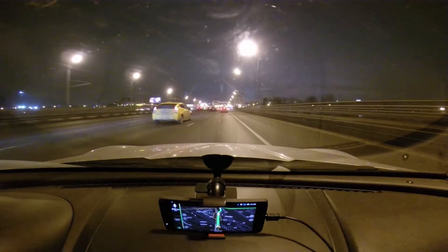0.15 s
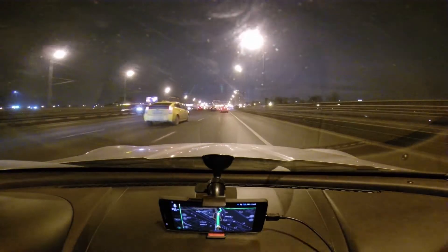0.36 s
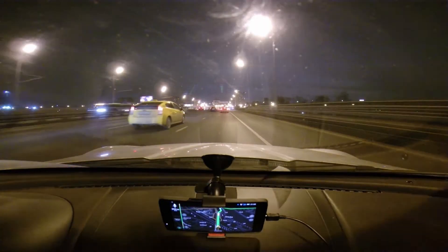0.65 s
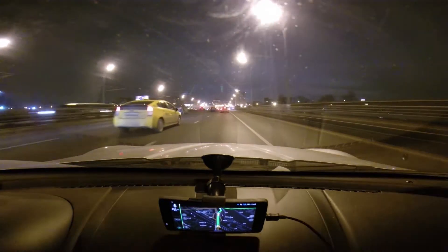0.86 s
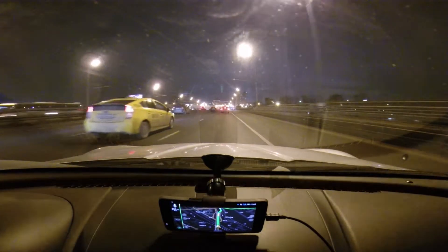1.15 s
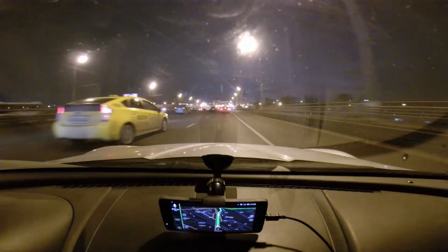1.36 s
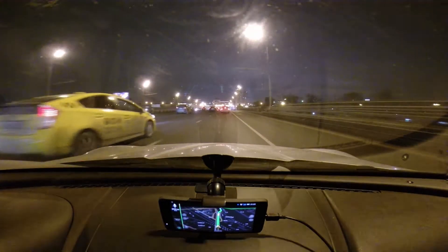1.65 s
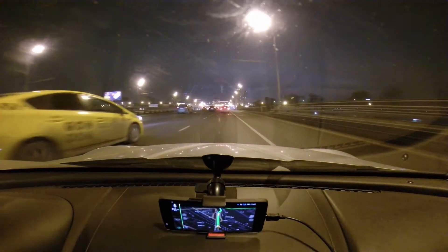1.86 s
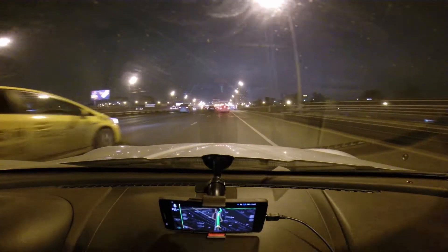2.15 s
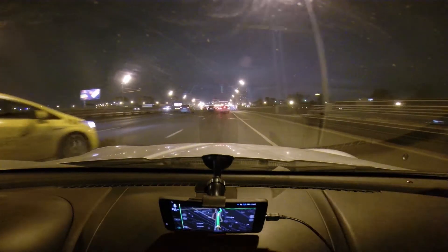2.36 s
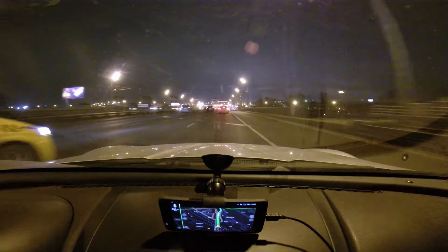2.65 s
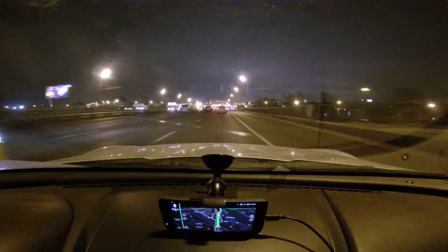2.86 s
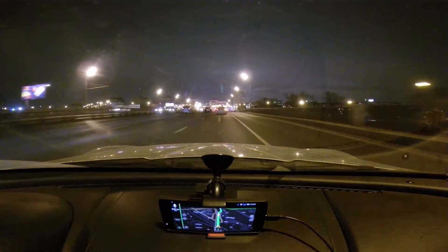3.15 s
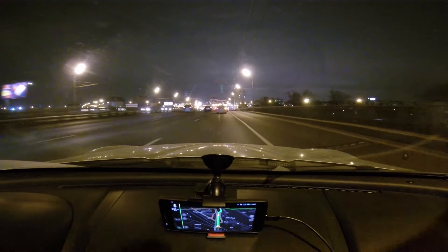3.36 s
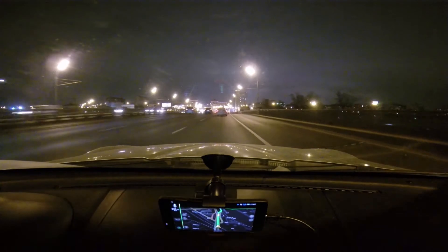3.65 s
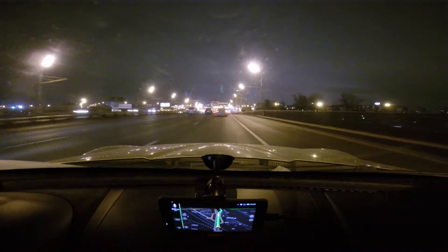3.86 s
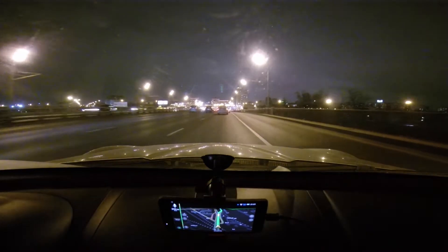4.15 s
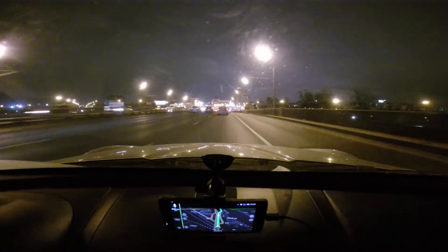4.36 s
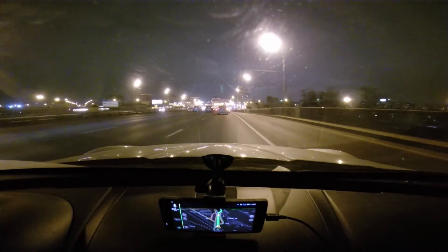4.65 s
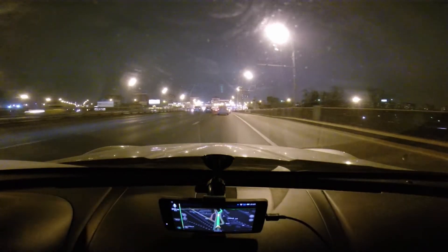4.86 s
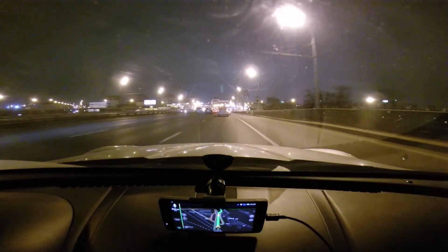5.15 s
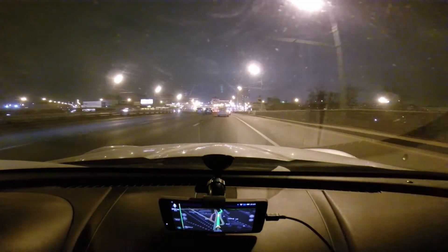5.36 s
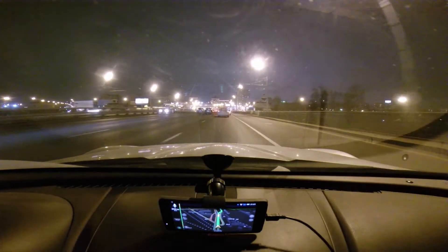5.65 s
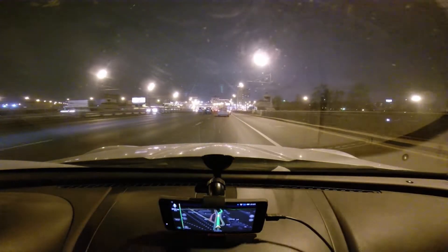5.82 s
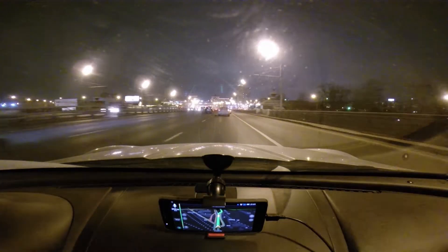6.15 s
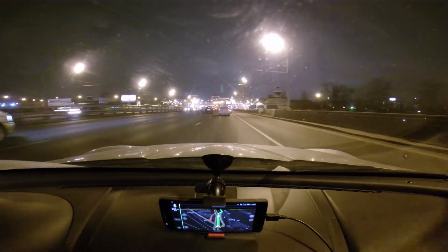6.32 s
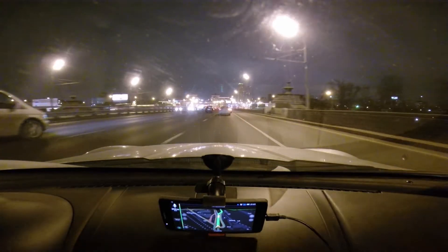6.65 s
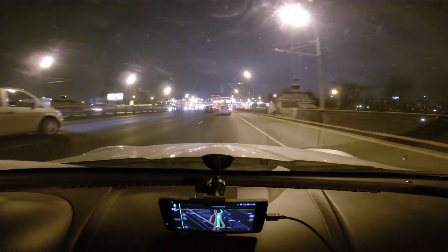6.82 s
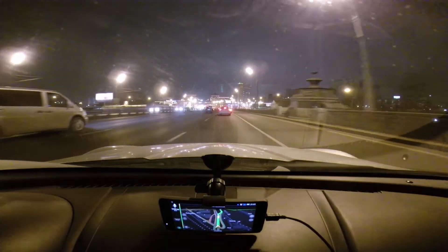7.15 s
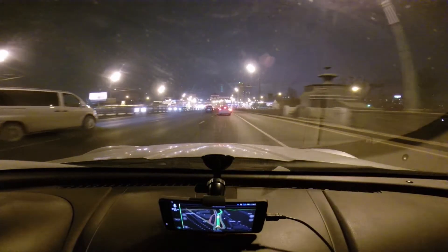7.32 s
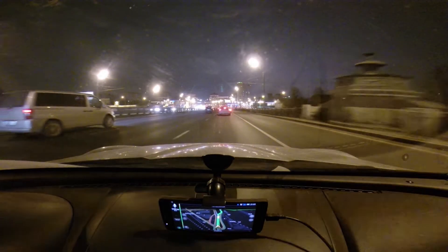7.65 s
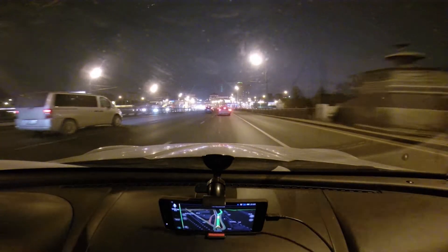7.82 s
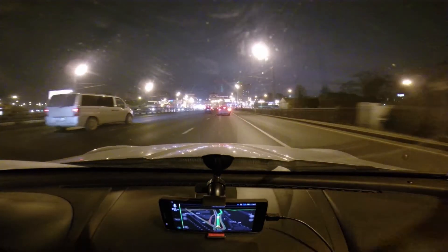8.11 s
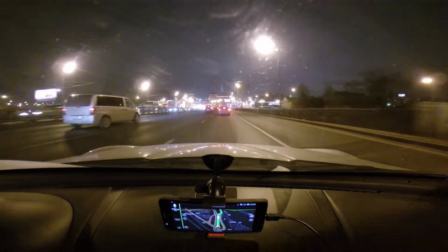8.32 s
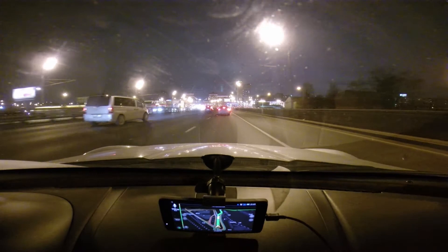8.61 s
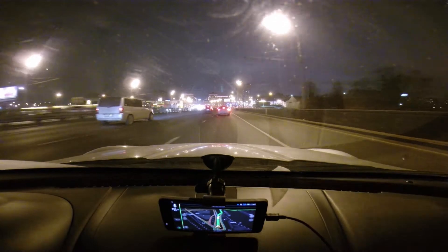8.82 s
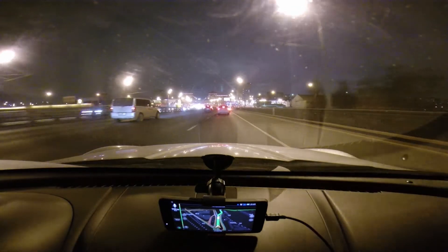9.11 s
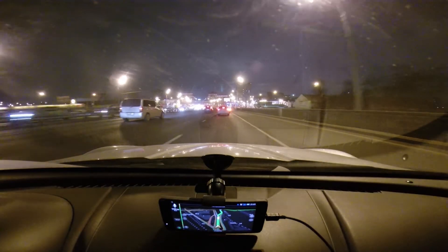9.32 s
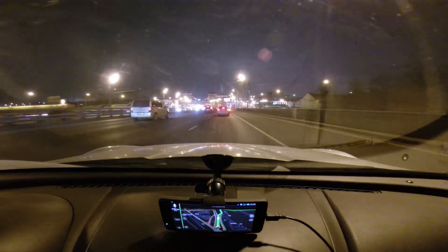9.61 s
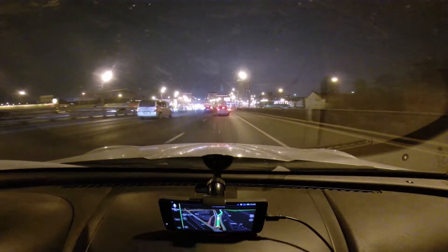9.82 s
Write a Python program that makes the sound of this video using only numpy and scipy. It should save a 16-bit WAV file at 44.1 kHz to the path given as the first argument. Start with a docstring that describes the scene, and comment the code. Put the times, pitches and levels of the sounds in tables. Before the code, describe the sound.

Steady highway cabin drone: low throbbing road boom, tyre roar, whistling air at the seals, faint engine hum and one brief trim rattle.

```python
"""A deep, fluttering boom, made from noise ringing the cabin air, swells with bumps in a car on a motorway.
Noise through resonances also gives the body rumble, panel hum and tyre roar, which share one level curve.
Filtered noise whistles and hisses at the seals and gaps, over a faint engine hum made of sine tones.
Very faint high buzz comes in short bursts, the tread sings for a while, and loose trim rattles
in one patch of short knocks."""
import sys
import numpy as np
from scipy import signal
from scipy.fft import rfft, irfft, next_fast_len
from scipy.io import wavfile
from scipy.ndimage import uniform_filter1d, minimum_filter1d

SR = 44100
rng = np.random.default_rng(int(sys.argv[2]) if len(sys.argv) > 2 else 0)


def dump_mix(stems):
    """Bounce the given channels to the path in sys.argv[1] as a 16-bit WAV at rate SR."""
    frames = np.atleast_2d(stems).T  # one column per channel
    limited = np.clip(frames, -1, 1)  # hard clip at full scale
    pcm = np.round(limited * 32767).astype(np.int16)
    wavfile.write(sys.argv[1], SR, pcm)


N = 440098

# In every MODES table the levels only compare the resonances of that table with each other.
# shared level of the road and wind noise; its sudden dips, written in here, stand for
# the recorder's gain control ducking after strong peaks: t/s, level change/dB
ROAD_WIND_LEVEL = [(0, 3), (0.5, 0.3), (1.1, 3), (1.8, 2.5), (2.1, 1), (3.32, 2), (3.6, -3.5), (4.0, 0.4),
                   (4.25, -1.5), (4.7, 0.5), (5.78, 0.2), (5.84, -4.5), (6.35, 0.23), (8.6, 0.5),
                   (8.78, -1.5), (9.25, 0.5), (9.84, -0.3), (9.98, -5)]
# bumps that set the boom, before the boom trim: start/s, length/s, level/dB
BUMPS = [(0.031, 0.088, -9.5), (0.289, 0.23, -8.5), (0.984, 0.034, -10), (1.075, 0.04, -8.5),
         (1.219, 0.04, -8.5), (1.275, 0.104, -9.5), (1.554, 0.042, -8), (1.699, 0.049, -11.5),
         (1.914, 0.086, -7), (2.063, 0.075, -7.5), (2.449, 0.068, -11), (2.795, 0.088, -9),
         (2.915, 0.099, -8.5), (3.199, 0.088, -9), (3.343, 0.076, -6), (3.479, 0.068, -8),
         (4.139, 0.088, -8), (4.856, 0.034, -10), (5.012, 0.064, -8.5), (5.286, 0.065, -7),
         (5.436, 0.038, -7.5), (5.607, 0.04, -8), (5.674, 0.031, -8), (5.782, 0.048, -7.5),
         (6.649, 0.06, -10), (6.791, 0.1, -10), (7.117, 0.23, -9), (7.702, 0.032, -7.5),
         (7.788, 0.064, -9.5), (8.057, 0.046, -8), (8.727, 0.079, -5.5), (9.318, 0.03, -10),
         (9.739, 0.026, -6.5), (9.847, 0.062, -5.5)]
# short lulls where the boom sinks, some standing for the same gain ducking: start/s, length/s, change/dB
LULLS = [(0.14, .08, -8), (.85, 0.088, -6.5), (2.17, 0.14, -14), (2.66, 0.13, -5.5), (3.6, 0.074, -4.5),
         (5.86, 0.27, -4), (8.26, .07, -10.5)]
# jolts through the suspension: start/s, length/s, body rumble change/dB, panel hum change/dB
JOLTS = [(1.6, 0.27, 3, 1.5), (2.583, 0.089, -4, 7.5), (3.17, 0.37, 7.5, 2.5), (4.5, .15, 6, 0.5),
         (9.246, 0.27, 3.5, 2)]
# resonances of the cabin air that make the boom: f/Hz, width/Hz, level/dB
CABIN_MODES = [(107.36, 9.9, 2), (110.4, 12, -5)]
# weaker air resonances on either side of the boom: f/Hz, width/Hz, level/dB
FLANK_MODES = [(88, 10, -6), (123.7, 14, 0)]
# resonances of the sprung car body: f/Hz, width/Hz, level/dB
BODY_MODES = [(24, 32, -8), (41.5, 17, 2), (65.6, 34, -3)]
# resonances of the floor panels: f/Hz, width/Hz, level/dB
PANEL_MODES = [(143.8, 11, 0.5), (163.2, 26, -1.5), (200.6, 7.9, -10.5), (223.4, 50, -15)]
# resonances of the tyres, carcass and tread: f/Hz, width/Hz, level/dB
TYRE_MODES = [(302, 58, -1.5), (376.8, 74, -6), (473, 58, -11), (565.5, 76, -6.5), (640, 110, -10),
              (721, 125, -8.5), (832, 55, -8.5), (936, 50, -3.5), (1037, 140, -5.5), (1199, 190, -6),
              (1369, 110, -8.5), (1537, 180, -11), (1676, 215, -12), (1835, 74, -14.5), (2014, 310, -14)]
# resonances at the window seals: f/Hz, width/Hz, level/dB
SEAL_MODES = [(2010, 130, -9), (2488, 160, 0.0), (2680, 72, -3.2), (2780, 320, -7.3)]
# resonances of the gaps in the trim: f/Hz, width/Hz, level/dB
GAP_MODES = [(3447, 510, 3), (4250, 1234, -1), (5130, 1900, -9.5), (5870, 353, -5), (7924, 12000, -27.5)]
# the main engine tone heard in the cabin: t/s, f/Hz, level/dB
ENGINE = [(0, 322, -41), (.7, 314, -40), (1.3, 308, -41), (2.4, 286, -44), (3.6, 300, -58), (6, 318, -56),
          (7, 313, -50), (9.98, 306, -54)]
# resonances of the high buzz: f/Hz, width/Hz, level/dB
BUZZ_MODES = [(6780, 200, -13.5), (7450, 160, -2.5), (8120, 220, -9), (8750, 240, -10.5),
              (11300, 7000, -19.5)]
# the narrow resonance of the singing tread: f/Hz, width/Hz, level/dB
SONG_MODES = [(571, 11, 0)]
# knocks of loose trim: t/s, peak level/dB, top edge f/Hz, decay/s
RATTLE = [(3.263, -31, 9500, .005), (3.280, -19.5, 4400, .0022), (3.314, -21, 9500, .003),
          (3.333, -18, 4300, .002), (3.365, -38, 9500, .002), (3.428, -33, 7000, .004),
          (3.502, -27, 3500, .002)]
# resonances of the loose trim: f/Hz, width/Hz, level/dB
TRIM_MODES = [(1400, 800, 1), (2400, 900, 0), (3450, 1000, 0), (4500, 700, -7), (7000, 6000, -20)]

# the boom between bumps, before the boom trim, and its random swelling
BOOM_DB, BOOM_FLUTTER_DB, BOOM_FLUTTER_S = -15, 2.5, 0.044
BUMP_EDGE_S, JOLT_EDGE_S = 0.028, 0.065  # smoothing of the rises and falls
FLANK_DB = -21.5
# levels where the shared level curve is at 0 dB, before jolts and other swelling
RUMBLE_DB, PANEL_DB, DRUM_DB = -28.5, -29, -40.5
TREAD_DB, WHISTLE_DB, HISS_DB = -35.5, -45.5, -57.5
BOOM_FOLLOW, BODY_FOLLOW, HISS_FOLLOW = 0.75, 0.5, 0.87  # dB per dB of the shared level curve
DRUM_JOLT_SHARE = 0.53  # part of the panels' jolt, in dB, that the tyre drumming shares
# the seal whistle grows and stays louder
WHISTLE_RISE_S, WHISTLE_RISE_LENGTH_S, WHISTLE_RISE_DB = 5.78, 0.64, 5
SONG_START_S, SONG_LENGTH_S, SONG_DB = 1.45, 1.3, -45.5
TOP_HZ = 13500  # the whole sound is cut above this


def undb(db):
    """Turn decibels into a gain."""
    return 10 ** (np.asarray(db) / 20)


def curves(table):
    """Join the columns of a table by straight lines in time."""
    s, *columns = np.transpose(table)
    return [np.interp(np.arange(N) / SR, s, column) for column in columns]


def unit(x):
    """Scale to an rms (average strength) of 1."""
    return x / np.sqrt(np.mean(x ** 2))


def resonate(x, modes):
    """Pass a force through steep resonances whose powers add, then scale to rms 1."""
    size = next_fast_len(len(x))
    f = np.maximum(np.arange(size // 2 + 1) * SR / size, 1)
    power = np.zeros(len(f))
    for hz, width, db in modes:
        offset = (f * f - hz * hz) / (f * width)  # distance from the peak
        power += undb(db) ** 2 / (1 + offset ** 2) ** 2
    rung = irfft(rfft(x, size) * np.sqrt(power), size)
    return unit(rung[:len(x)])


def noise():
    """Make the random push of road grain or turbulent air."""
    return rng.standard_normal(N)


def smooth(x, seconds):
    """Take a running mean twice."""
    size = max(int(seconds * SR), 1)
    return uniform_filter1d(uniform_filter1d(x, size), size)


def steady(x, seconds):
    """Even out swells slower than the given time; quicker beating stays."""
    power = np.maximum(smooth(x * x, seconds), 0)
    return unit(x / np.sqrt(power + 1e-6))


def band(x, low_hz, high_hz):
    """Keep one band of pitches, with steep edges and no delay."""
    sos = signal.butter(4, [low_hz, high_hz], "band", fs=SR, output="sos")
    return signal.sosfiltfilt(sos, x)


def stretches(rows, edge_s):
    """Set each (start, length, size) stretch and round its edges; very short ones stay below full size."""
    out = np.zeros(N)
    for start, length, size in rows:
        out[max(int(start * SR), 0):int((start + length) * SR)] = size
    return smooth(out, seconds=edge_s)


def boom_level(level_db):
    """The boom flutters between bumps and sinks in lulls; each bump moves it to a level of its own, in dB."""
    flutter = BOOM_FLUTTER_DB * unit(smooth(noise(), seconds=BOOM_FLUTTER_S))
    between = BOOM_DB + BOOM_FOLLOW * level_db + flutter
    between += stretches(LULLS, BUMP_EDGE_S)
    on_bump = stretches([(start, length, 1) for start, length, _ in BUMPS], BUMP_EDGE_S)
    return (1 - on_bump) * between + stretches(BUMPS, BUMP_EDGE_S)


def cabin_boom(level_db, trim_db, low_hz, high_hz):
    """Road noise rings the cabin's air resonances, which beat against each other."""
    gain = undb(boom_level(level_db) + trim_db)
    air = resonate(noise(), CABIN_MODES)
    # shaping twice lets the air follow the bumps while it stays in its narrow band
    for _ in range(2):
        air = band(steady(air, seconds=0.038) * gain, low_hz, high_hz)
    # the flanking resonances murmur on between bumps
    flank = steady(resonate(noise(), FLANK_MODES), seconds=0.05)
    return air + flank * undb(FLANK_DB)


def body_rumble(level_db):
    """Road noise rocks the sprung body at its low resonances, and jolts change the rumble."""
    jolts = stretches([(start, length, db) for start, length, db, _ in JOLTS], JOLT_EDGE_S)
    body = steady(resonate(noise(), BODY_MODES), seconds=0.17)
    return body * undb(RUMBLE_DB + BODY_FOLLOW * level_db + jolts)


def panel_hum(level_db, jolts):
    """Road noise shakes the floor panels, which hum at their resonances."""
    panels = steady(resonate(noise(), PANEL_MODES), seconds=0.36)
    return panels * undb(PANEL_DB + BODY_FOLLOW * level_db + jolts)


def tyre_roar(level_db, jolts, split_hz):
    """Road grain drums the tyre carcasses below the split and makes the tread roar above it."""
    carcass_modes = [mode for mode in TYRE_MODES if mode[0] < split_hz]
    tread_modes = [mode for mode in TYRE_MODES if mode[0] >= split_hz]
    drum_db = DRUM_DB + BODY_FOLLOW * level_db + DRUM_JOLT_SHARE * jolts
    drum = resonate(noise(), carcass_modes) * undb(drum_db)
    tread = resonate(noise(), tread_modes) * undb(TREAD_DB + level_db)
    return drum + tread


def wind(level_db, flutter_db):
    """Turbulent air whistles at the seals and hisses in the gaps, fluttering with its eddies."""
    rise = np.clip((np.arange(N) / SR - WHISTLE_RISE_S) / WHISTLE_RISE_LENGTH_S, 0, 1)
    eddies = undb(flutter_db * unit(smooth(noise(), seconds=0.027)))
    whistle = resonate(noise(), SEAL_MODES) * undb(WHISTLE_DB + level_db + WHISTLE_RISE_DB * rise)
    hiss = resonate(noise(), GAP_MODES) * undb(HISS_DB + HISS_FOLLOW * level_db)
    return (whistle + hiss) * eddies


def engine(below_db, above_db, waver_db):
    """The engine hums on one tone plus the octaves below and above it, slightly uneven in level."""
    hz, db = curves(ENGINE)
    phase = 2 * np.pi * np.cumsum(hz) / SR
    hum = np.sin(phase)
    hum += undb(below_db) * np.sin(phase / 2)
    hum += undb(above_db) * np.sin(2 * phase)
    waver = waver_db * unit(smooth(noise(), seconds=0.19))
    return unit(hum) * undb(db + waver)


def buzz(db, gap_s, length_s, scatter):
    """High, resonant noise sounds in short bursts at uneven intervals."""
    gaps = gap_s * np.exp(scatter * rng.standard_normal(size=120))
    starts = np.cumsum(gaps) - gap_s
    t = np.arange(N) / SR
    since = t - starts[np.searchsorted(starts, t) - 1]  # time since the latest burst began
    gate = (since >= 0) & (since < length_s)
    return undb(db) * smooth(gate * 1.0, seconds=0.002) * resonate(noise(), BUZZ_MODES)


def tread_song(edge_s):
    """On one patch of asphalt a narrow tread resonance swells out of the roar and sinks back."""
    swell = stretches([(SONG_START_S, SONG_LENGTH_S, undb(SONG_DB))], edge_s)
    return resonate(noise(), SONG_MODES) * swell


def rattle(attack_s):
    """Each knock is a short scrape that rings the trim, with its own top edge and decay."""
    out = np.zeros(N)
    t = np.arange(SR // 20) / SR
    for s, db, top_hz, decay_s in RATTLE:
        ring = band(resonate(rng.standard_normal(len(t)), TRIM_MODES), 810, top_hz)
        knock = ring * (1 - np.exp(-t / attack_s)) * np.exp(-t / decay_s)
        start = int(s * SR)
        out[start:start + len(t)] += undb(db) * knock / np.abs(knock).max()
    return out


def limit(x, ceiling, hold_s):
    """Turn the gain down smoothly around every peak that would pass the ceiling."""
    gain = np.minimum(1, ceiling / (np.abs(x) + 1e-9))
    held_gain = minimum_filter1d(gain, int(hold_s * SR) + 1)
    return x * smooth(held_gain, seconds=hold_s / 2)


def scene():
    """Add up everything that reaches the dashboard."""
    level_db, = curves(ROAD_WIND_LEVEL)
    panel_jolts = stretches([(start, length, db) for start, length, _, db in JOLTS], JOLT_EDGE_S)
    out = cabin_boom(level_db, trim_db=0.12, low_hz=81.0, high_hz=145)
    out += body_rumble(level_db)
    out += panel_hum(level_db, panel_jolts)
    out += tyre_roar(level_db, panel_jolts, split_hz=520)
    out += wind(level_db, flutter_db=0.34)
    out += engine(below_db=1.0, above_db=-11.0, waver_db=2.5)
    out += buzz(db=-68.5, gap_s=0.099, length_s=0.029, scatter=0.3)
    out += tread_song(edge_s=0.15)
    out += rattle(attack_s=0.00028)
    return out[None]


def record(dry):
    """The recorder holds down the strongest peaks and cuts the top of the treble."""
    held = limit(dry, ceiling=0.88, hold_s=0.025)
    # ripple 0.2 dB below the edge, at least 70 dB down beyond it
    top_cut = signal.ellip(8, 0.2, 70, TOP_HZ, fs=SR, output="sos")
    return signal.sosfilt(top_cut, held)


dry = scene()
out = record(dry)
dump_mix(out)
```